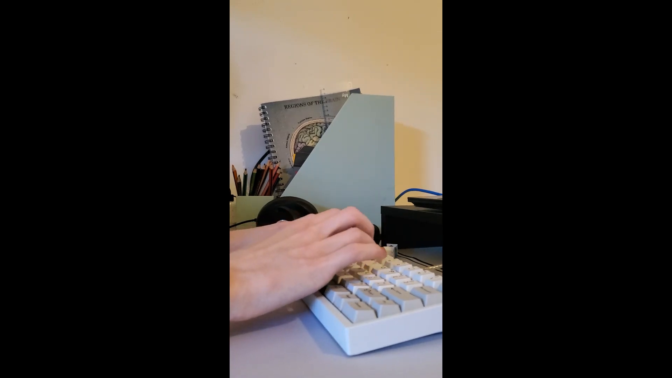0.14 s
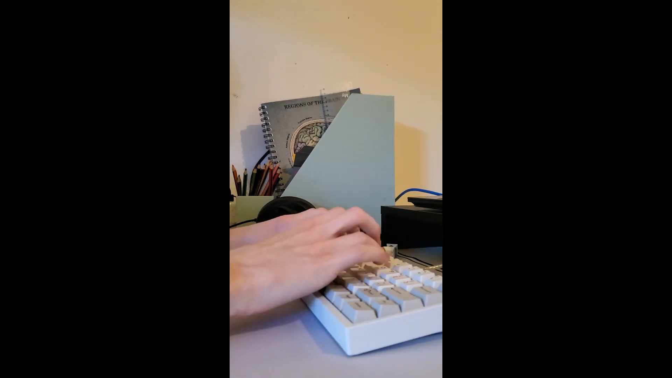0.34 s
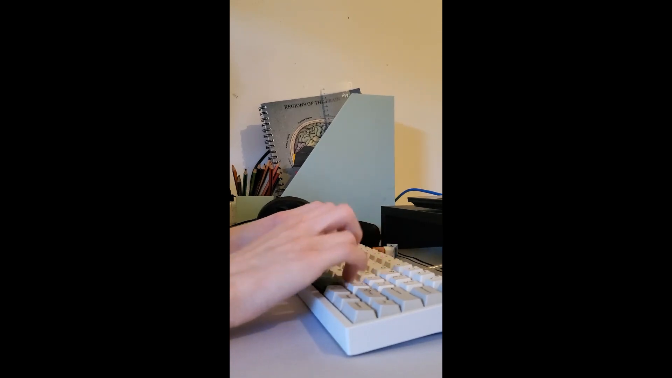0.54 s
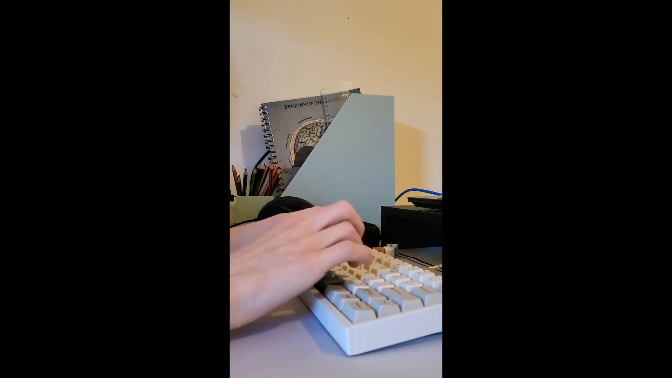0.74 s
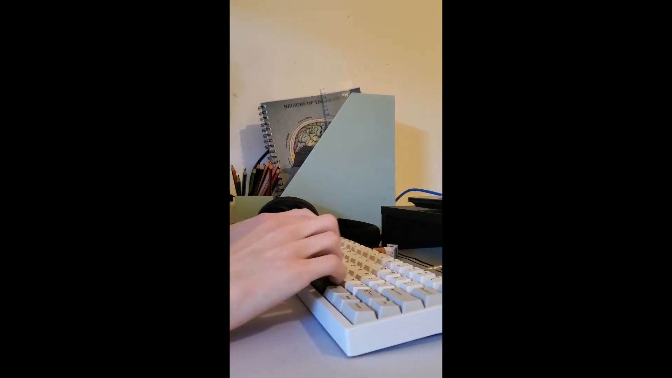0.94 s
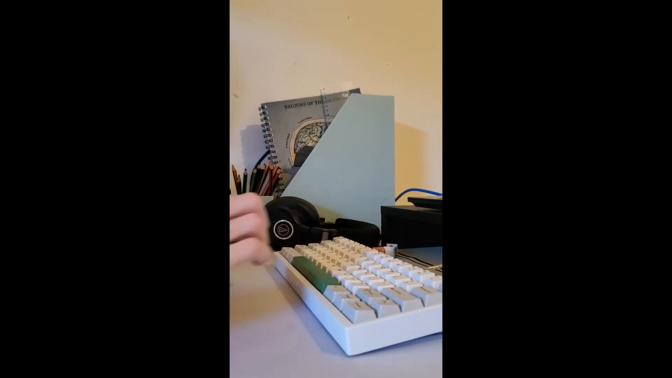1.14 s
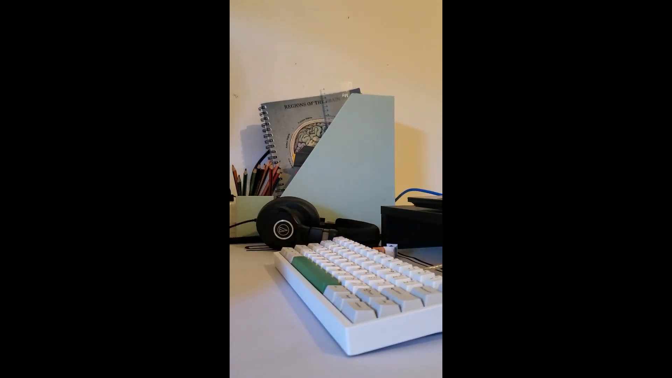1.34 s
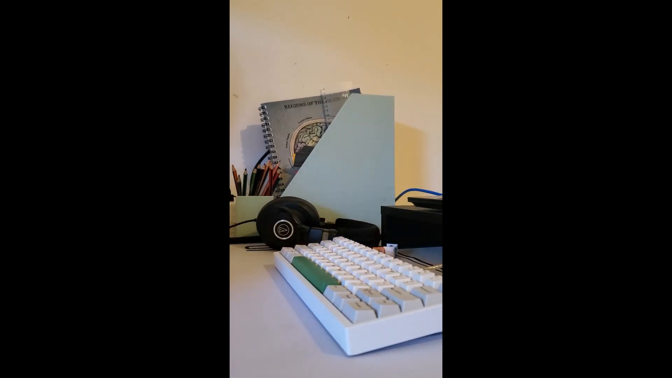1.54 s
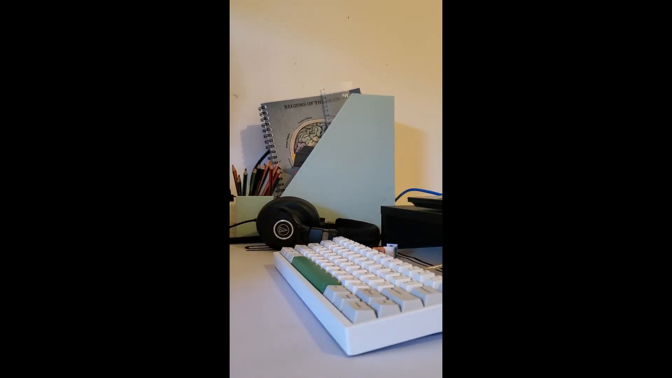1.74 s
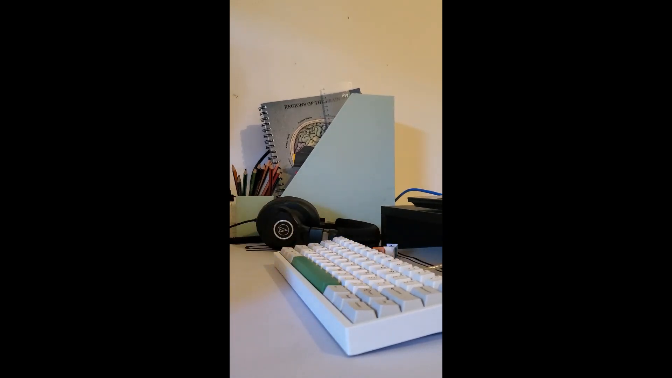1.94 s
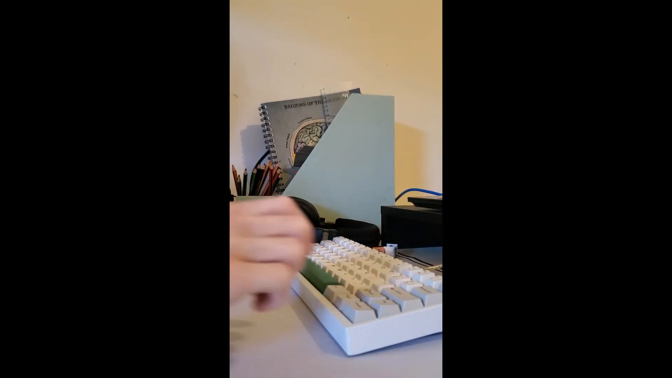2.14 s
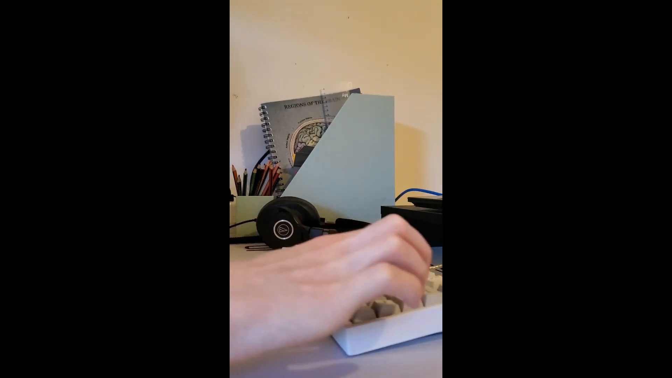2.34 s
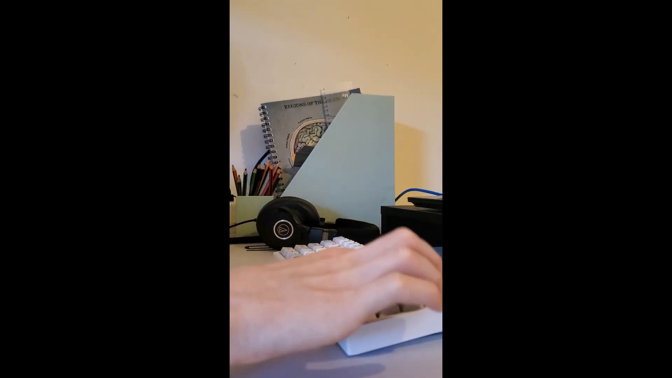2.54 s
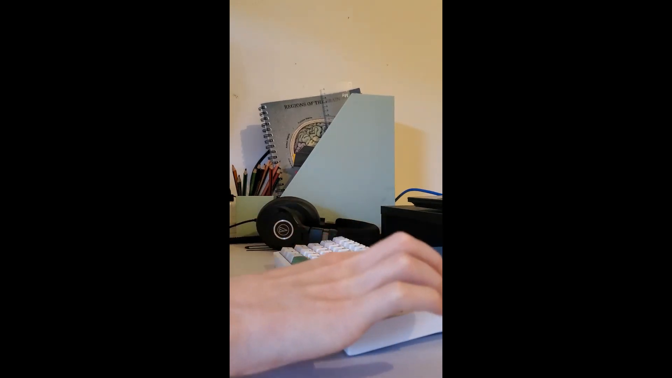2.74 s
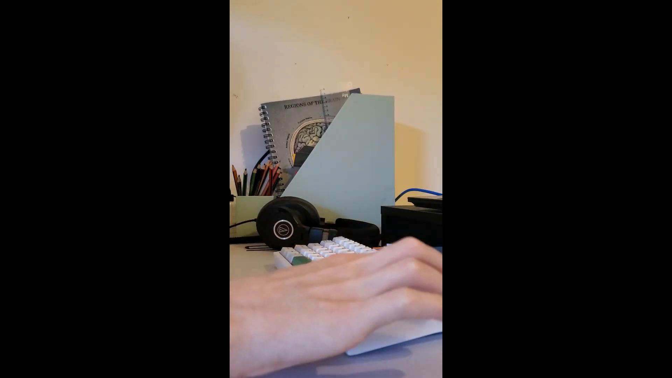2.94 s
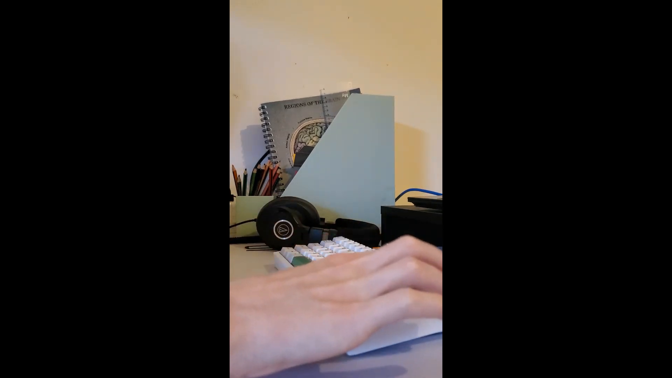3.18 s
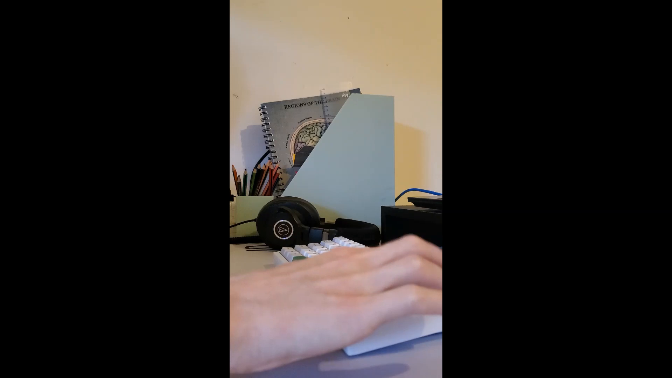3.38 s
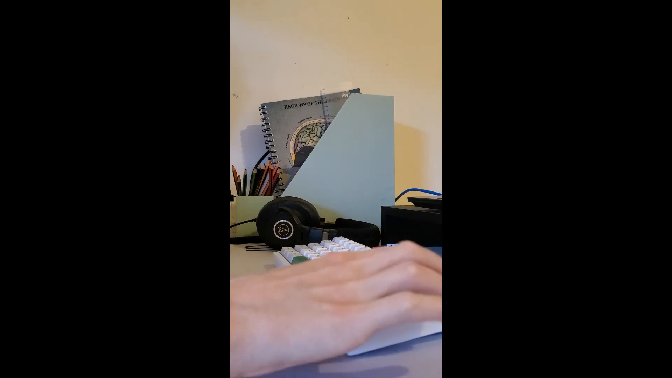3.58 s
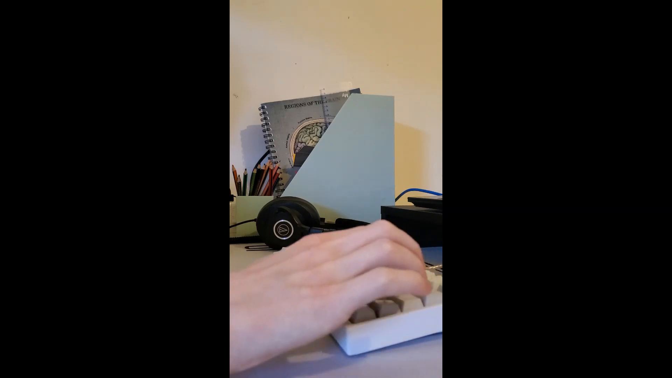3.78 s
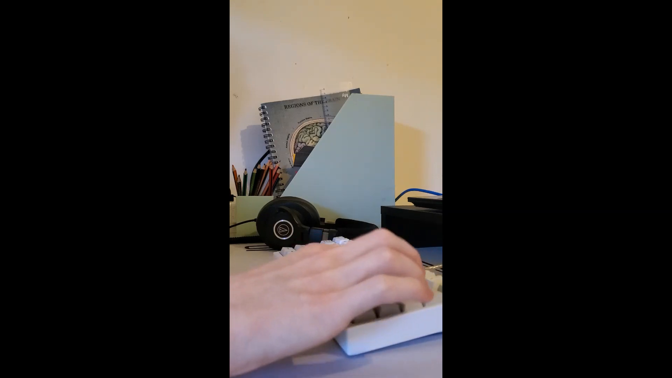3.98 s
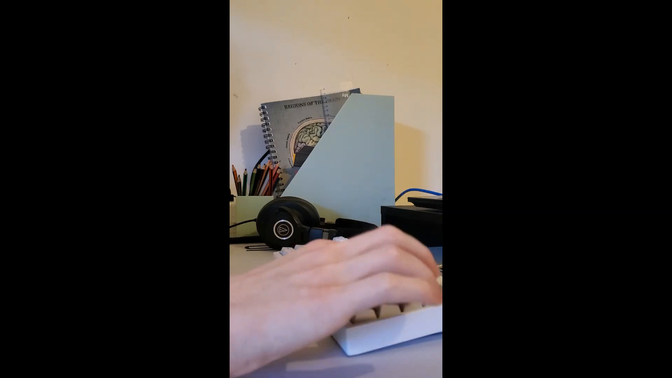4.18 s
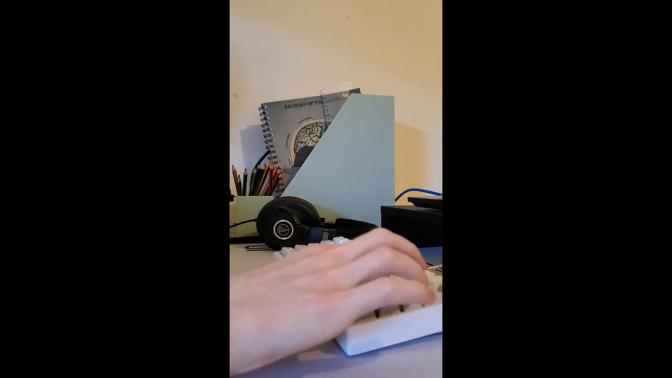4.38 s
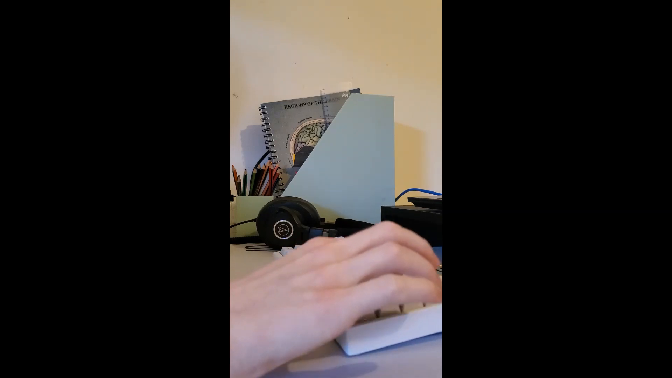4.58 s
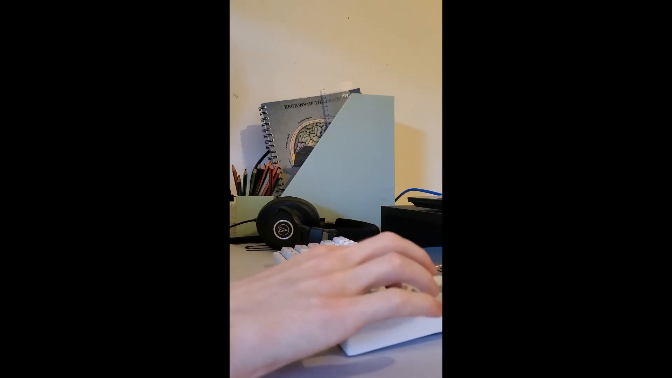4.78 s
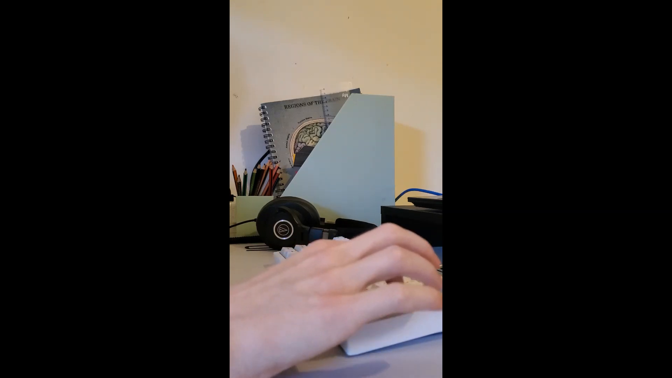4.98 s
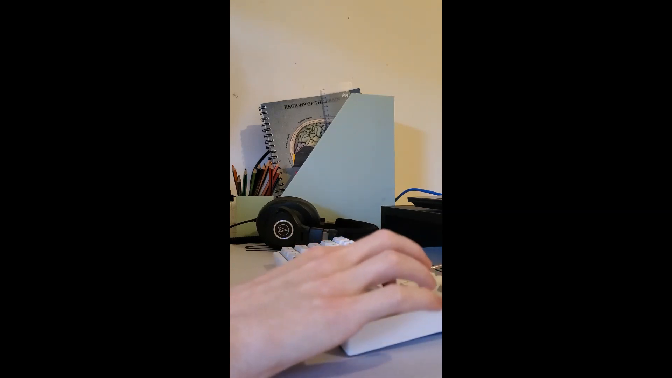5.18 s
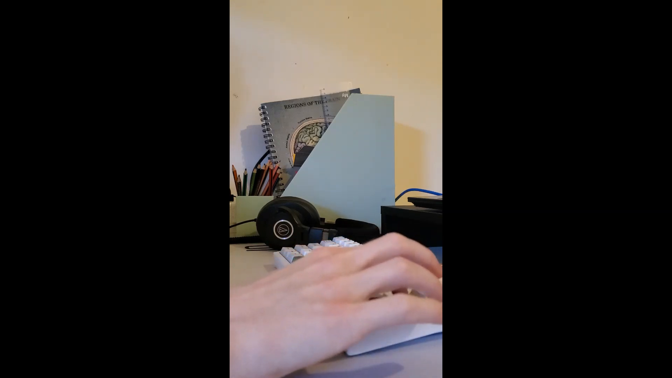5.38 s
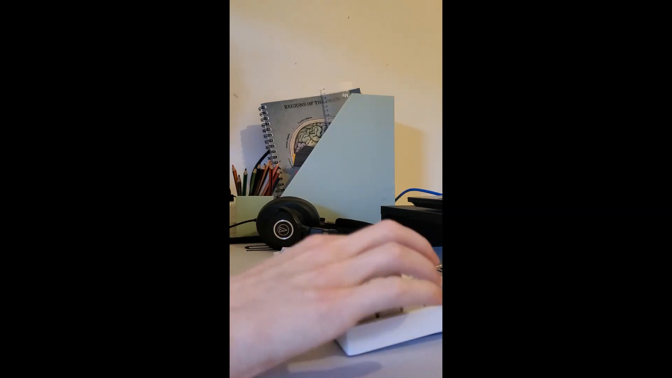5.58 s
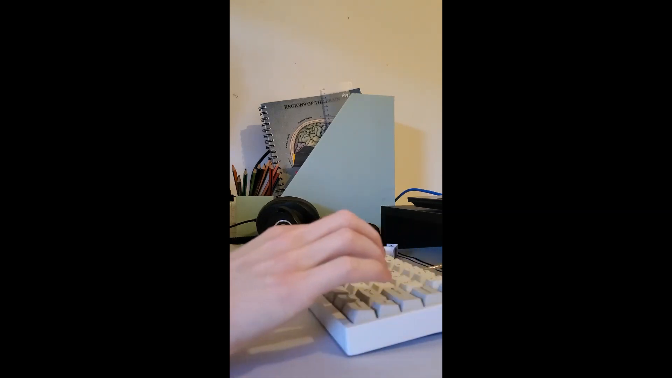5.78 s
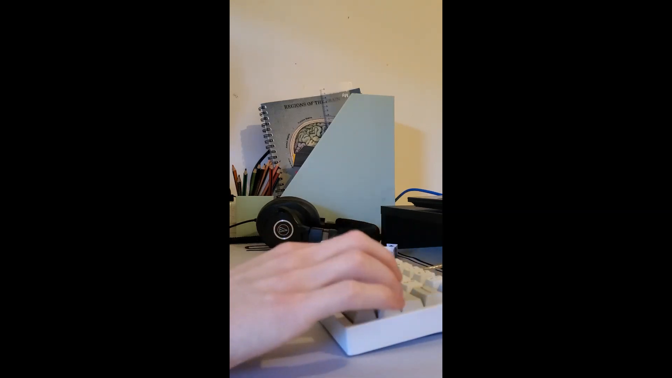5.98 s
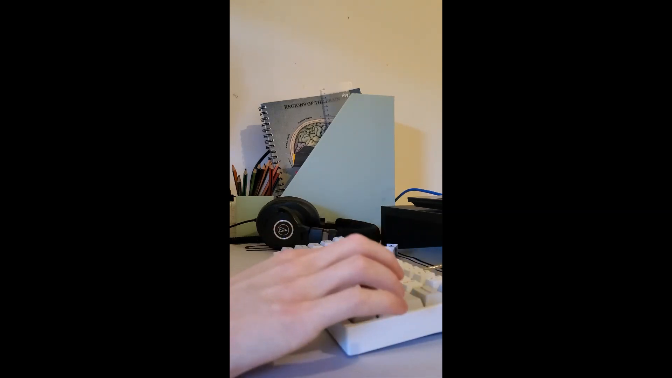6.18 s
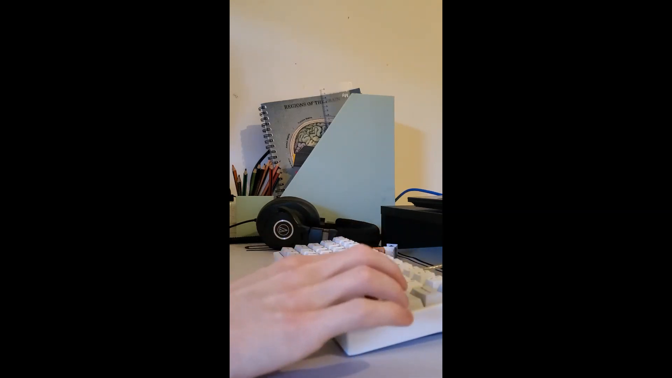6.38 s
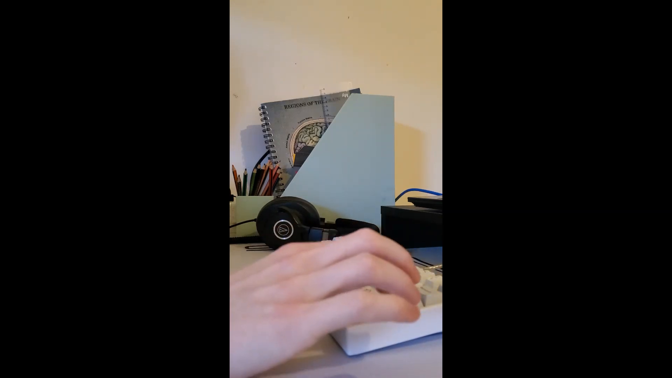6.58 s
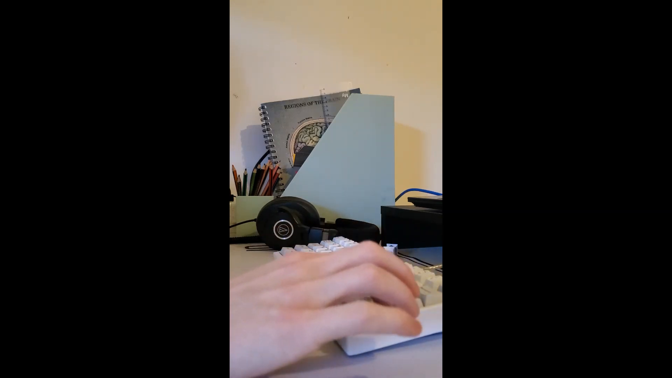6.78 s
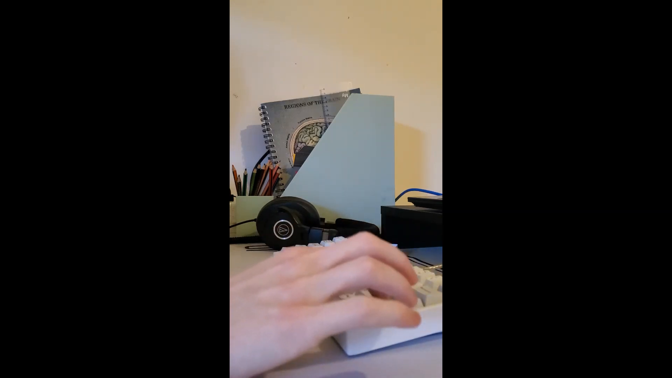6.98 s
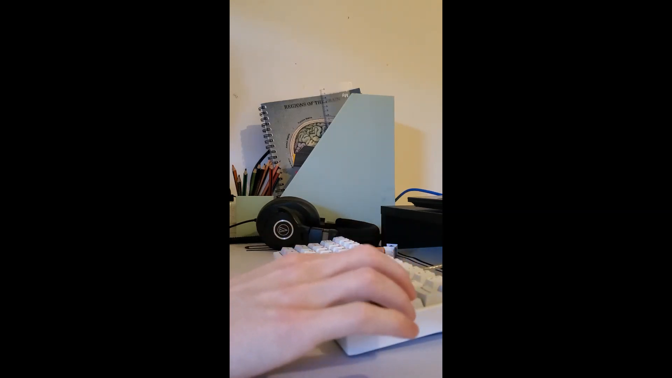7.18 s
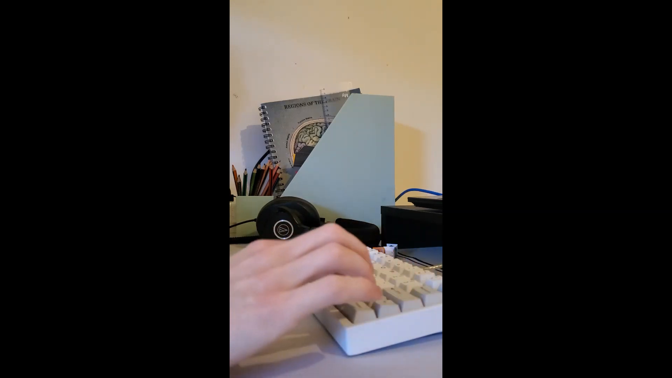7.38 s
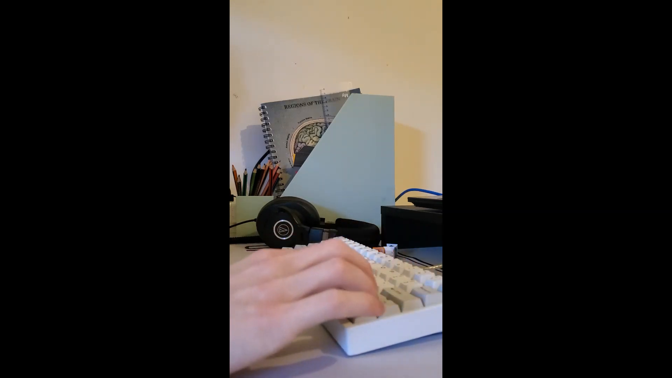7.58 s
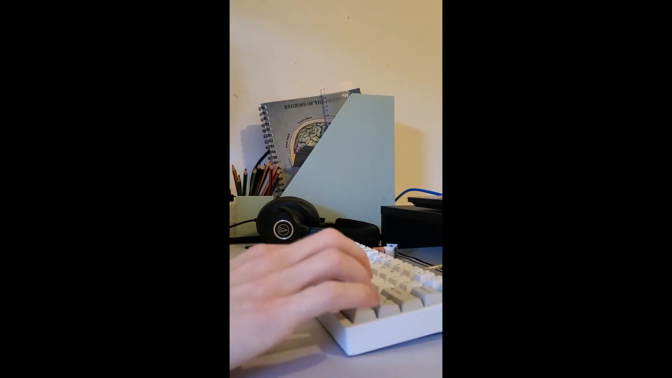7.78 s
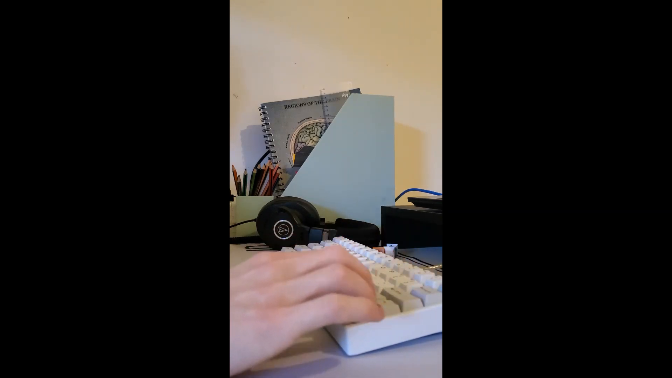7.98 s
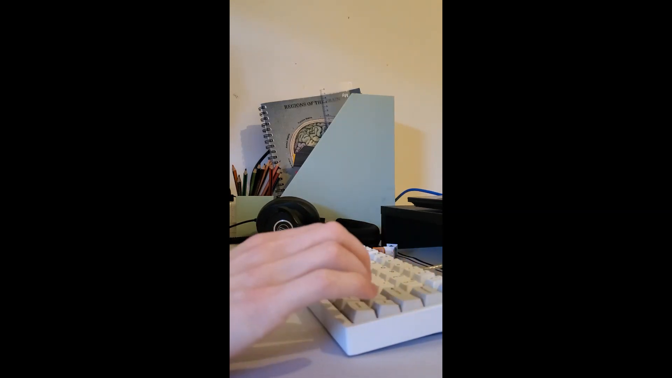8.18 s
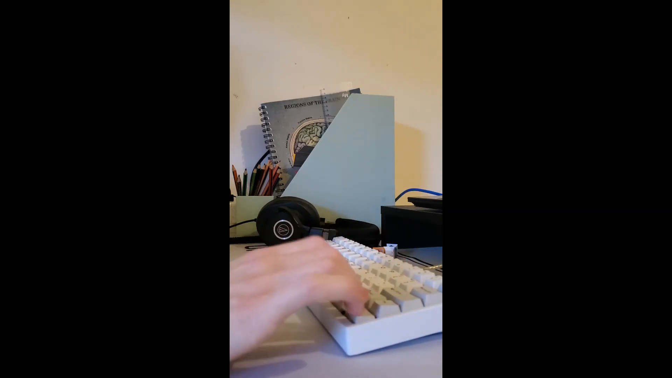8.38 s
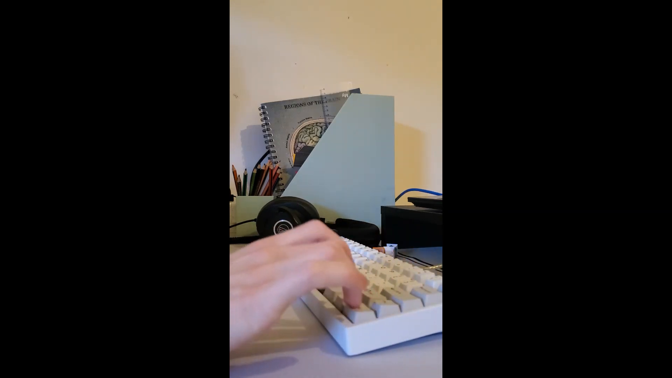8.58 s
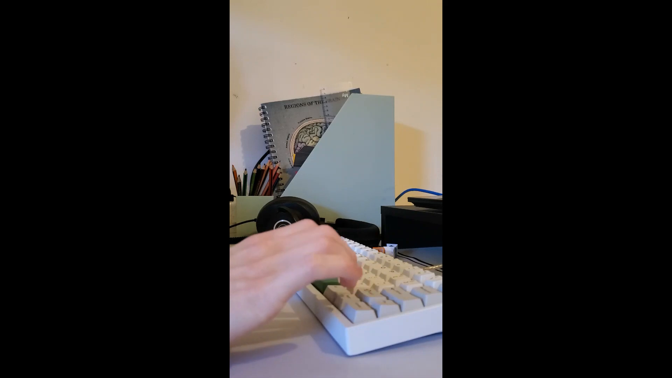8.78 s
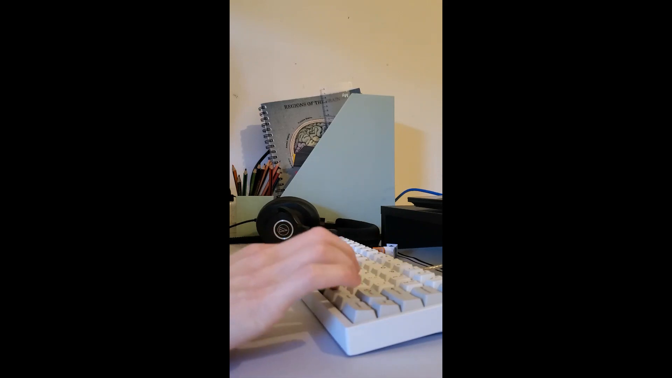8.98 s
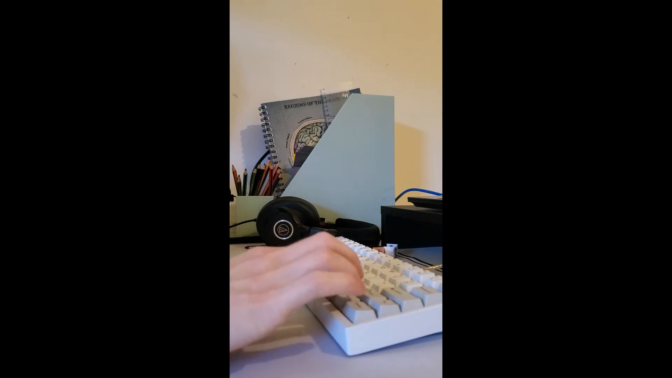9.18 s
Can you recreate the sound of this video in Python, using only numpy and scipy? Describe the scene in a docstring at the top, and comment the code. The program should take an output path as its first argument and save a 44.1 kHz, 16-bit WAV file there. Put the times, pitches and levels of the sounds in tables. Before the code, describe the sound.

In a small quiet room, fingers rake across a mechanical keyboard with a quick plastic rattle. The hand withdraws with a soft brush and a faint rustle. Then typing comes in six short bursts, each key clacking with a low desk thump and springing back with a lighter click. The microphone is close on the desk, much louder on the right, over a low hum.

```python
"""Trying out a mechanical keyboard

In a small quiet room a hand rakes across the keys, withdraws with a soft brush and rustle, then types
six bursts on keys of different kinds. Each key scrapes down its stem and lands: the cap clacks, the
switch ticks, the desk booms; it springs back with a lighter click. The microphone stands on the same
desk, its right side far louder than its left. A low hum lies under everything."""
import sys
import numpy as np
from scipy import signal
from scipy.fft import rfft, irfft
from scipy.io import wavfile

SR = 44100
rng = np.random.default_rng(int(sys.argv[2]) if len(sys.argv) > 2 else 0)


def dump_mix(stems):
    """Bounce the given channels to the path in sys.argv[1] as a 16-bit WAV at rate SR."""
    frames = np.atleast_2d(stems).T  # one column per channel
    limited = np.clip(frames, -1, 1)  # hard clip at full scale
    pcm = np.round(limited * 32767).astype(np.int16)
    wavfile.write(sys.argv[1], SR, pcm)


N = 407043
TIME = np.arange(N) / SR
KEY_SIZE = 2600   # samples in one key sound

# keys landing, in six bursts: t/s, click level/dB, brightness/dB, desk thump/dB, kind of key
PRESSES = [(2.5018, -37.5, 0.5, -28, "full"), (2.6415, -39.5, -3, -28, "full"),
           (2.7725, -39, 0, -27.5, "round"), (2.902, -40.5, 1.5, -30.5, "round"),
           (3.0245, -44, -1.5, -33.5, "round"), (3.136, -44, -1, -35, "round"),
           (3.2529, -43, -2, -32.5, "round"), (3.3689, -42, 0, -29, "round"),
           (3.486, -38.5, 2, -24.5, "round"), (3.6146, -38.5, 1.5, -28.5, "round"),
           (3.9545, -43, 6.5, -25.5, "full"), (4.0934, -43, -5, -27.5, "sharp"),
           (4.229, -45, 3.5, -27.5, "sharp"), (4.3722, -49.5, -0.5, -28.5, "thin"),
           (4.479, -54.5, -6, -30, "thin"), (4.6076, -50, 9, -28, "sharp"),
           (4.7272, -44, 1, -26.5, "sharp"), (4.858, -53.5, 4.5, -29, "thin"),
           (4.9788, -61.5, 2, -32, "thin"), (5.0965, -46.5, 3, -27, "sharp"),
           (5.2253, -45.5, 2.5, -26.5, "full"), (5.367, -55, -1, -29.5, "thin"),
           (5.4629, -57, 1, -27.5, "thin"), (5.5774, -44, -1.5, -25.5, "sharp"),
           (5.959, -42.5, 3.5, -30, "deep"), (6.0946, -37, -1, -29.5, "deep"),
           (6.227, -39.5, 2, -28.5, "deep"), (6.3472, -37.5, -1.5, -31, "deep"),
           (6.4623, -36.5, 1.5, -31.5, "deep"), (6.741, -51, -5.5, -38.5, "springy"),
           (6.871, -42, -1.5, -31.5, "springy"), (7.0044, -43, -0.5, -33.5, "springy"),
           (7.131, -42.5, 1, -30.5, "springy"), (7.2474, -38, -1, -32, "springy"),
           (7.5195, -44, 1, -34.5, "bright"), (7.6573, -41, 2, -32.5, "bright"),
           (7.79, -43, 4, -34, "bright"), (7.925, -42, 2.5, -32.5, "bright"),
           (8.0537, -41.5, 3.5, -30.5, "bright"), (8.424, -41, 6.5, -32.5, "hard"),
           (8.5585, -37.5, 0, -31, "hard"), (8.6914, -33.5, 5, -31.5, "hard"),
           (8.9957, -52.5, -6, -51.5, "hard"), (9.1396, -44, 0, -40, "hard")]
# keys springing back up: t/s, level/dB, brightness/dB
RELEASES = [(2.573, -45, 0.5), (2.709, -45, -2), (2.8376, -46, -4.5), (2.958, -53, 0.5),
            (3.1964, -50.5, -6.5), (3.3099, -51, -2), (3.4315, -52.5, 1), (3.5507, -48.5, 2),
            (3.6902, -51.5, 10.5), (4.0322, -44.5, -9.5), (4.1633, -41.5, -2.5), (4.3017, -42, -1),
            (4.5441, -47, -6.5), (4.6705, -46, 3), (5.0384, -44.5, -3.5), (5.175, -48.5, -8),
            (5.294, -43.5, -8), (5.5198, -49, -1), (5.6583, -41.5, -7), (6.032, -49.5, -5.5),
            (6.1602, -46.5, -2.5), (6.2869, -46.5, -2.5), (6.4023, -48, 0), (6.5413, -50, -3.5),
            (6.8109, -53, -1.5), (6.9367, -45.5, -9.5), (7.073, -47.5, -10), (7.189, -43.5, -7.5),
            (7.3327, -48, -5.5), (7.598, -49, -5.5), (7.736, -54.5, 8.5), (7.863, -48.5, 0),
            (7.9829, -46.5, 8), (8.1415, -51, -9.5), (8.5118, -53, 5.5), (8.6396, -45, -4.5),
            (8.7909, -48.5, -4.5), (9.07, -53.5, 1), (9.202, -49.5, -2.5)]
# fingers touching the keyboard without pressing a key: t/s, tap/dB, desk thump/dB
TOUCHES = [(0.0, -60, -38), (0.126, -53.5, -67), (1.038, -69.5, -44), (1.068, -67.5, -53),
           (1.093, -93.5, -40), (5.949, -57.5, -48), (8.977, -60, -43)]
# kinds of key: cap f/Hz, housing tick/dB, spring snap/dB, spring f/Hz, case knock/dB
# (tick and snap are relative to the cap's clack, the knock to the desk thump)
KEY_KINDS = {"round": (1838, -8, -14.5, 13400, -26), "full": (1911, -5, -6, 13898, -26),
             "sharp": (1796, 4, 3, 12800, -24.5), "thin": (2303.5, 7, -0.5, 12015, -26),
             "deep": (1759, -8.5, -18.5, 12805, -24), "springy": (1815, -8, -5.5, 10898, -21.5),
             "bright": (2325, -7, -6.5, 11500, -20), "hard": (1785, -5.5, -14, 14203, -21.5)}


def from_db(db):
    """Turn decibels into a factor to multiply by."""
    return 10 ** (np.asarray(db) / 20)


def rms_one(x):
    """Scale a sound so that its average strength (rms) is 1."""
    return x / np.sqrt(np.mean(x ** 2) + 1e-20)


def at_hz(points, hz):
    """Read between the rows of a table, with the octaves evenly spaced."""
    freqs, values = np.transpose(points)
    return np.interp(np.log(np.maximum(hz, 1)), np.log(freqs), values)


def band(x, low_hz, high_hz):
    """Keep the part of a sound between two frequencies."""
    edges_hz = [low_hz, min(high_hz, SR / 2 - 1000)]
    return signal.sosfilt(signal.butter(2, edges_hz, "band", fs=SR, output="sos"), x)


def colour(x, points):
    """Shape the tone of a sound to follow a table of f/Hz, level/dB."""
    size = 8192
    gains = from_db(at_hz(points, np.fft.rfftfreq(size, 1 / SR)))
    # minimum phase: the filter rings after a click, never before it
    cepstrum = irfft(np.log(gains))
    cepstrum[1:size // 2] *= 2
    cepstrum[size // 2 + 1:] = 0
    return signal.fftconvolve(x, irfft(np.exp(rfft(cepstrum))))[:len(x)]


def drift(per_s):
    """A smooth random wander, about 1 in size."""
    knots = rng.standard_normal(1000)
    return np.interp(TIME * per_s, np.arange(len(knots)), knots)


def add(track, s, sound):
    """Mix a short sound in at s seconds."""
    start = max(round(s * SR), 0)
    track[start:start + len(sound)] += sound[:N - start]


def grains(size, per_s, spread_db):
    """Tiny clicks at random times, of uneven strength and sign."""
    born = rng.random(size) < per_s / SR
    return born * rng.standard_normal(size) * from_db(spread_db * rng.standard_normal(size))


def push(length_s):
    """A soft pulse of force that adds up to 1."""
    force = np.sin(np.pi * np.clip(TIME[:KEY_SIZE] / length_s, 0, 1)) ** 2
    return force / force.sum()


def ringing(modes, t, uneven_db):
    """A struck thing's own tones (modes), mixed anew at each blow; each fades 60 dB in its t60."""
    hz, level_db, t60 = np.transpose(modes)[:, :, None]
    tones = from_db(level_db - 60 * t / t60) * np.sin(2 * np.pi * hz * t)
    return from_db(uneven_db * rng.standard_normal(len(modes))) @ tones


def background(hum_left_db=-8, hum_right_db=3.0, waver=0.12):
    """Faint hiss and rumble, and a slightly wavering hum that comes up through the desk."""
    # hiss and rumble: f/Hz, level/dB per Hz
    air = [(20, -100), (50, -84), (70, -81), (100, -82), (140, -90), (200, -95), (400, -102.5),
           (700, -110.5), (2000, -117.5), (5000, -123), (8000, -132), (11000, -124.5), (16000, -123)]
    # the left side's hiss compared with the right's: f/Hz, level/dB
    air_left = [(200, -11.5), (1000, 0), (16000, 1.5)]
    # tones of the hum: f/Hz, level/dB
    hum_tones = [(48.6, -52.5), (145.6, -71.5), (194, -81.5), (307, -74), (311, -92.5), (344, -85.5)]
    hum = 0
    for hz, db in hum_tones:
        strength = from_db(db) * np.sqrt(2) * (1 + waver * drift(25.0))
        hum = hum + strength * np.sin(2 * np.pi * hz * (TIME + 0.00096 * drift(4)))
    left, right = [colour(rng.standard_normal(N) * np.sqrt(SR / 2), air) for side in range(2)]
    return np.array([colour(left, air_left), right]) + hum * from_db([[hum_left_db], [hum_right_db]])


def glide(length_s, start_hz, end_hz):
    """An echo smeared into a short rising chirp."""
    t = np.arange(0, max(length_s, .002), 1 / SR)
    sweep = signal.chirp(t, start_hz, t[-1], end_hz) * signal.windows.tukey(len(t))
    return sweep / np.abs(rfft(sweep)).max()


def room(x, echo_db=0.0, tail_db=0.0, build_s=0.021):
    """Echoes from the wall and things on the desk, then a blurred tail whose bass lasts longest."""
    # echoes from near surfaces: delay/s, level/dB
    echoes = [(.0033, -10.5), (.0062, -18.5), (.0086, -13), (0.0108, -15), (0.027, -27), (0.034, -25.5)]
    # later, chirping echoes: start/s, end/s, from f/Hz, to f/Hz, level/dB
    chirps = [(.016, .034, 1800, 2550, -13), (.0255, .0315, 2150, 2650, -9.5),
              (.032, .036, 2200, 4800, -22)]
    # tone of the tail: f/Hz, level/dB
    tail_colour = [(200, 14.5), (900, -4.5), (1400, -5), (1850, -10), (2400, -7), (3200, -4.5),
                   (4500, -7.5), (6400, -8.5), (8000, -9), (11000, -8), (16000, -14)]
    # how long the tail lasts: f/Hz, t60/s
    tail_t60 = [(200, 0.34), (2000, 0.25), (6000, 0.2), (16000, 0.27)]
    t, edges_hz = TIME[:SR // 2], np.geomspace(120, 18000, 21)
    response = np.zeros(N)   # the room's answer to a single click
    for low, high in zip(edges_hz, edges_hz[1:]):
        hz = np.sqrt(low * high)
        decay = from_db(-60 * t / at_hz(tail_t60, hz)) * (1 - np.exp(-t / build_s))
        tail = band(rng.standard_normal(len(t)), low, high) * decay / np.linalg.norm(decay)
        add(response, 0, from_db(tail_db + at_hz(tail_colour, hz)) * tail)
    for delay_s, db in echoes:
        add(response, delay_s + rng.normal(0, .0002), from_db([db + echo_db]))
    for first_s, last_s, start_hz, end_hz, db in chirps:
        add(response, first_s, from_db(db + echo_db) * glide(last_s - first_s, start_hz, end_hz))
    return signal.fftconvolve(x, response[:len(t)])[:N]


def pop(start_s=6.028, onset_s=0.0016):
    """A soft microphone pop: a low swing that dies fast, with a short knock on top."""
    # the swing and the knock: f/Hz, level/dB, t60/s
    tones = [(73, -16.5, 0.039), (158, -26.5, 0.017)]
    t = np.maximum(TIME - start_s, 0)
    swings = sum(from_db(db - 60 * t / t60) * np.sin(2 * np.pi * hz * t) for hz, db, t60 in tones)
    return signal.fftconvolve(swings, push(onset_s))[:N]


def rub(spectrum):
    """Rubbing cloth makes a dense stream of tiny clicks."""
    return rms_one(colour(grains(N, per_s=12000, spread_db=2), spectrum))


def rustle():
    """The sleeve stirs faintly as the hand comes back."""
    # loudness of the rustle: t/s, level/dB
    levels = [(1.75, -79), (1.81, -65.5), (1.86, -76), (1.93, -84), (2.0, -68.5), (2.09, -69.5),
              (2.12, -82), (2.21, -75.5), (2.34, -90)]
    # its airy tone: f/Hz, level/dB
    spectrum = [(1400, -11), (1800, -11), (2200, -14), (4000, -14), (5500, -3.5), (7000, -7), (8300, -26),
                (10000, -11), (15000, -2.5)]
    level_db = np.interp(TIME, *np.transpose(levels), left=-np.inf, right=-np.inf)
    return from_db(level_db) * rub(spectrum)


def brush(start_s=1.587, rise_s=0.0071, hold_s=0.011, fade_s=0.06, level_db=-51):
    """One quick stroke of cloth, like a sleeve over the desk."""
    # tone of the stroke: f/Hz, level/dB
    spectrum = [(500, -12.5), (1400, -5.5), (2000, -1), (2400, 0), (3200, -16.5), (5000, -3), (7000, -9),
                (11000, -16), (16000, -9)]
    corners_s = start_s + np.cumsum([0, rise_s, hold_s, fade_s])
    return from_db(level_db) * np.interp(TIME, corners_s, [0, 1, 1, 0]) * rub(spectrum)


def squeak():
    """Skin rubs on the desk: noise so narrow that it is almost a tone."""
    # one faint squeak: middle t/s, half length/s, f/Hz, width/Hz, level/dB
    skin_squeak = (1.99, .03, 1800, 90, -75)
    s, half_s, hz, width_hz, db = skin_squeak
    swell = np.maximum(1 - np.abs(TIME - s) / half_s, 0)
    tone = rms_one(band(rng.standard_normal(N), hz - width_hz / 2, hz + width_hz / 2))
    return from_db(db) * swell * tone


def sliding_db(s):
    """How hard the fingers slide at s seconds; silent once the hand has lifted."""
    # fingers sliding over the caps: t/s, level/dB
    levels = [(0.0, -53.5), (0.156, -57.5), (0.3, -48), (0.378, -55.5), (0.476, -47), (0.656, -76),
              (0.798, -75), (0.95, -99)]
    return np.interp(s, *np.transpose(levels), right=-np.inf)


def sliding_fingers(level_db=-5):
    """Skin and nails jostle caps of different pitch, making small separate ticks."""
    caps = [(1000, 0), (1750, 3.5), (2250, 2.5), (2700, -3.0), (3200, -4), (4200, -1)]   # f/Hz, level/dB
    ticks = 0
    for hz, db in caps:
        hollow = [(200, -22), (hz * 0.62, -17), (hz, 0), (hz * 1.11, -16), (7000, -24), (16000, -24)]
        ticks = ticks + from_db(db) * rms_one(colour(grains(N, per_s=110, spread_db=3), hollow))
    return from_db(sliding_db(TIME) + level_db) * rms_one(ticks)


def raked_caps(count=6, span_s=.56, flick_db=10, flick_hz=2520, spread_octaves=0.41, thump_db=5):
    """List the caps that the raking fingers flick: loud ones, and lighter ones at random between."""
    # the loudest flicks: t/s, level/dB, cap f/Hz, desk thump/dB, kind of stroke
    loud_flicks = [(0.0498, -36.5, 3270, -37, "straight"), (0.0563, -40.5, 2040, -45, "straight"),
                   (0.129, -35, 1510, -40.5, "straight"), (0.155, -34.5, 2090, -46, "straight"),
                   (0.171, -38.5, 1740, -51, "sideways"), (0.2363, -34, 2430, -32, "sideways"),
                   (0.2446, -39, 2070, -60, "sideways"), (0.2946, -31.5, 1720, -45, "sideways"),
                   (0.3208, -34, 2600, -30, "sideways"), (0.3275, -33, 2700, -41, "sideways"),
                   (0.336, -41, 2700, -38.5, "sideways"), (0.383, -31, 1700, -39, "sideways"),
                   (0.403, -41.5, 2900, -34, "sideways"), (0.4252, -32.5, 2340, -44, "sideways"),
                   (0.433, -42, 2330, -44, "sideways"), (0.4829, -33.5, 1740, -38, "sideways"),
                   (0.4935, -38, 3000, -42.5, "sideways"), (0.521, -35, 2200, -43, "straight"),
                   (0.637, -41, 3740, -52, "straight"), (0.6519, -31.5, 2000, -36, "straight"),
                   (0.765, -45, 2100, -45.5, "straight")]
    flicks = list(loud_flicks)
    times = (np.arange(count) + rng.random(count)) * span_s / count
    for s, (softer_db, pitch) in zip(times, rng.standard_normal((count, 2))):
        slide_db, cap_hz = sliding_db(s), flick_hz * 2 ** (spread_octaves * pitch)
        flicks.append((s, slide_db + flick_db - softer_db, cap_hz, slide_db + thump_db, "sideways"))
    return flicks


def press_before(s):
    """The row of the last key pressed before s seconds."""
    return [press for press in PRESSES if press[0] < s][-1]


def desk(flicks, lag_s=0.0036, push_s=0.007, rake_push_s=0.0084, thump_db=-2.5, lift_db=-10):
    """Each finger loads the desk, each release unloads it; raking pushes more slowly and booms lower."""
    # modes of the desk: f/Hz, level/dB, t60/s, direction of swing at the microphone
    modes = [(51.8, -17, 0.78, -1), (71.5, -2, 0.015, -1), (96.84, 1, 0.29, 1), (111, -11.5, 0.019, -1),
             (170, -21, 0.15, -1), (197.6, -10.5, 0.5, 1), (228, -7, 0.07, -1)]
    blows = [(s + lag_s, from_db(db + thump_db), push_s) for s, _, _, db, _ in PRESSES]
    blows += [(s + lag_s, from_db(db + thump_db), push_s) for s, _, db in TOUCHES]
    for s, _, _ in RELEASES:
        *_, load_db, _ = press_before(s)
        blows.append((s, -from_db(load_db + lift_db), push_s))
    blows += [(s, from_db(db), rake_push_s) for s, _, _, db, _ in flicks]
    out, t = np.zeros(N), TIME[:SR // 2]
    hz, level_db, t60, direction = np.transpose(modes)[:, :, None]
    decays = np.sign(direction) * from_db(level_db - 60 * t / t60)
    for s, force, length_s in blows:
        detune = 1 + .025 * rng.standard_normal()   # the weight of the hand shifts the pitch
        rings = decays * np.sin(2 * np.pi * hz * detune * t)
        # where the finger lands decides how the modes share the blow
        shares = from_db(6.0 * rng.standard_normal(len(modes)))
        boom = rms_one(shares @ rings) * rings.sum(0).std()
        add(out, s, force * signal.fftconvolve(boom, push(length_s)))
    return out


def case(knock_t60=0.057, knock_db=-1.5, tap_t60=0.18, tap_db=3.0, ring_db=-0.5):
    """A press knocks dully on the case; a bare fingertip makes a papery tap and a hollow ring."""
    # modes of the case under a fingertip: f/Hz, level/dB, t60/s
    modes = [(990, 5.5, 0.082), (1067, -2, 0.099), (1240, -12, 0.068), (1550, -1, 0.035), (1900, 1, 0.073)]
    # tone of the tap: f/Hz, level/dB
    fingertip = [(400, -10), (1000, 15.0), (1900, 2), (3000, -8.5), (6500, -3.5), (16000, -26)]
    out, t = np.zeros(N), TIME[:KEY_SIZE]
    for s, _, _, db, kind in PRESSES:
        *_, kind_db = KEY_KINDS[kind]
        knock = rms_one(band(rng.standard_normal(KEY_SIZE), low_hz=129, high_hz=297))
        add(out, s, from_db(db + kind_db + knock_db - 60 * t / knock_t60) * knock)
    for s, db, _ in TOUCHES:
        noise = rms_one(colour(rng.standard_normal(KEY_SIZE), fingertip))
        tap = from_db(tap_db - 60 * t / tap_t60) * noise
        add(out, s, from_db(db) * (tap + from_db(ring_db) * ringing(modes, t, uneven_db=6)))
    return out


def plate(level_db=-23):
    """The metal plate under the keys pings faintly; the harder a key lands, the louder."""
    # modes of the plate: f/Hz, level/dB, t60/s
    modes = [(1470, -2, 0.2), (2280, -24, 0.11), (2487, -3.5, 0.3), (2640, -0.5, 0.091)]
    out, t = np.zeros(N), TIME[:SR // 4]
    for s, db, *_ in PRESSES:
        add(out, s, from_db(db + level_db) * ringing(modes, t, uneven_db=3))
    return out


def scrape(length_s):
    """The stem of a moving key rubs in fine grains, harder and harder until it stops."""
    t = TIME[:KEY_SIZE]
    swell = np.sqrt(t / length_s) * (t < length_s)
    return rms_one(band(grains(KEY_SIZE, per_s=11000, spread_db=3), low_hz=1200, high_hz=5500)) * swell


def struck(modes, centre_hz, crack_db, low_hz, high_hz, focus_db=14.5, detune=0.023, uneven_db=3.5,
           rattle=0.88, rattle_s=0.0011, crack_cycles=31.0, build_s=0.000088):
    """One part of a key cracks at its own pitch and its nearby modes ring; being loose, it chatters."""
    t = TIME[:KEY_SIZE]
    crack = (centre_hz, crack_db, crack_cycles / centre_hz)
    hz, level_db, t60 = np.transpose(list(modes) + [crack])[:, :, None]
    level_db = level_db - focus_db * np.abs(np.log2(hz / centre_hz))
    pitch, strength, phase = rng.standard_normal((3, len(hz), 1))
    t60 = np.minimum(t60, 28 / hz)   # plastic stops any ring within 28 cycles
    decay = from_db(level_db + uneven_db * strength - 60 * t / t60)
    rings = decay * np.sin(2 * np.pi * hz * (1 + detune * pitch) * t + 1.29 * phase)
    rings *= 1 - np.exp(-t / build_s)   # plastic gives a little, so the ring takes a moment to build
    contacts = rattle * grains(KEY_SIZE, per_s=2700, spread_db=3) * np.exp(-t / rattle_s)
    contacts[0] = 1   # the main hit, ahead of the chatter
    sound = band(signal.fftconvolve(rings.sum(0), contacts)[:KEY_SIZE], low_hz, high_hz)
    return sound / np.sqrt(np.mean(sound[:265] ** 2))   # rms 1 over the first 6 ms


def click(cap_db, cap_hz, housing_db, spring_db, spring_hz, stroke="straight"):
    """Cap, switch housing and spring sound together; the plate under the switch adds a dull tock."""
    # modes of the key cap: f/Hz, level/dB, t60/s
    cap_modes = [(1217, 10, .026), (1398, 3.5, .022), (1532, 6.5, .025), (1757, 9.5, .026),
                 (1932, 2.5, .025), (2180, 6, .024), (2360, -3, .03), (2644, -6, .028), (3160, 3, .018)]
    # modes of the housing, the shell of the switch: f/Hz, level/dB, t60/s
    housing_modes = [(3490, -14, 0.0036), (4390, 12.5, 0.0035), (5090, 8, 0.0076), (6070, 12, 0.0066),
                     (6580, 7, 0.013)]
    # modes of the spring: f/Hz, level/dB, t60/s
    spring_modes = [(9380, 5, 0.0032), (10400, 2, .005), (11780, 6.5, 0.015), (13200, -1.5, 0.0049),
                    (14630, 12.5, 0.012), (14300, -7.5, 0.011)]
    # a cap hit straight cracks broadly; flicked sideways it rings at its own pitch:
    # crack/dB, ring length/cycles, loss of the other modes/dB per octave
    strokes = {"straight": (16, 7.3, 9.7), "sideways": (19, 15, 18)}
    crack_db, cycles, focus_db = strokes[stroke]
    clack = struck(cap_modes, cap_hz, crack_db, low_hz=1100, high_hz=4000, focus_db=focus_db,
                   detune=.008, uneven_db=1.5, rattle=.25, crack_cycles=cycles)
    tock = rms_one(band(rng.standard_normal(KEY_SIZE), low_hz=474, high_hz=1190))
    tock *= from_db(-2.5) * np.exp(-TIME[:KEY_SIZE] / 0.0085)
    tick = struck(housing_modes, centre_hz=5850, crack_db=-0.5, low_hz=3350, high_hz=8477)
    snap = struck(spring_modes, spring_hz, crack_db=3.0, low_hz=8500, high_hz=18000, focus_db=16.0)
    return from_db(cap_db) * clack + from_db(housing_db) * (tick + tock) + from_db(spring_db) * snap


def keys(flicks, travel_s=0.013, scrape_db=-23, release_scrape_db=-16, housing_share=0.58):
    """Keys land, spring back or get flicked; brightness lifts the spring fully, the housing partly."""
    # faint ticks of a nail or finger on a key, just before a press or after a release:
    # t/s, housing tick/dB, spring snap/dB
    finger_ticks = [(3.699, -54.5, -70), (3.9472, -54, -44.5), (7.508, -62, -67), (8.416, -54, -68)]
    out = np.zeros(N)
    for s, db, bright_db, _, kind in PRESSES:
        cap_hz, tick_db, snap_db, spring_hz, _ = KEY_KINDS[kind]
        housing_db = db + tick_db + housing_share * bright_db
        stroke_s = travel_s * rng.uniform(0.94, 1.3)
        add(out, s - stroke_s, from_db(db + scrape_db) * scrape(stroke_s))
        add(out, s, click(db, cap_hz, housing_db, db + snap_db + bright_db, spring_hz))
    for s, db, bright_db in RELEASES:
        *_, kind = press_before(s)
        cap_hz, _, _, spring_hz, _ = KEY_KINDS[kind]
        housing_db, spring_db = db - 1.5 + housing_share * bright_db, db - 7.5 + bright_db
        add(out, s - travel_s, from_db(db + release_scrape_db) * scrape(travel_s))
        add(out, s, click(db, 0.82 * cap_hz, housing_db, spring_db, spring_hz))   # lower than the press
    for s, housing_db, spring_db in finger_ticks:
        add(out, s, click(-58, 1560, housing_db, spring_db, spring_hz=17000))
    for s, db, cap_hz, _, stroke in flicks:   # a raked cap barely moves its switch
        cap_db, housing_db, spring_db = db - 10, db - 18, db - 22
        add(out, s, click(cap_db, cap_hz, housing_db, spring_db, spring_hz=9860, stroke=stroke))
    return out


def scene(left_direct_db=4.5, left_tail_db=9.0, left_delay_s=.0001):
    """The microphone's right side hears the keys directly; its left hears mostly the room."""
    # tone of the left side: f/Hz, level/dB
    left_colour = [(100, -18.5), (500, -33), (1500, -17.5), (3000, -10.5), (5500, -22.5), (6700, -23.5),
                   (7300, -67), (8200, 3), (10000, -14), (12000, -14.5), (16000, -21)]
    # tone of the right side: f/Hz, level/dB
    right_colour = [(100, 8.5), (700, -7), (1500, 2), (3000, 12), (6600, 3), (7600, 0), (8800, -2),
                    (10500, 10), (16000, 2.5)]
    flicks = raked_caps()
    handling = sliding_fingers() + case() + plate() + brush() + squeak()
    boom = desk(flicks)
    direct = keys(flicks) + handling
    # a key sends a different mix of its modes each way, so the room sounds smoother than the click
    directions = [direct] + [keys(flicks) + handling for direction in range(2)]
    share = 1 / np.sqrt(len(directions))
    left_room = share * sum(room(x, tail_db=left_tail_db) for x in directions)
    right_room = share * sum(room(x) for x in directions)
    delayed = np.interp(TIME - left_delay_s, TIME, direct + boom)
    left = from_db(left_direct_db) * delayed + left_room + room(boom, echo_db=3.5, tail_db=-19.0)
    right = direct + boom + right_room + rustle()
    return np.array([colour(left, left_colour) + pop(), colour(right, right_colour)]) + background()


def record(dry, low_hz=36, high_hz=16200):
    """The deepest bass is turned down and the highest treble is cut steeply."""
    thinned = signal.sosfilt(signal.butter(4, low_hz, "high", fs=SR, output="sos"), dry)
    return signal.sosfilt(signal.ellip(10, .2, 70, high_hz, fs=SR, output="sos"), thinned)


dry = scene()
out = record(dry)
dump_mix(out)
```